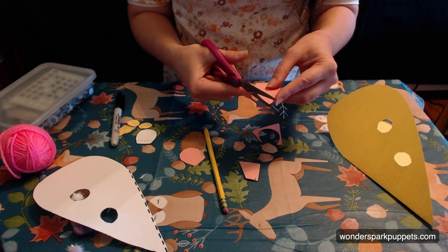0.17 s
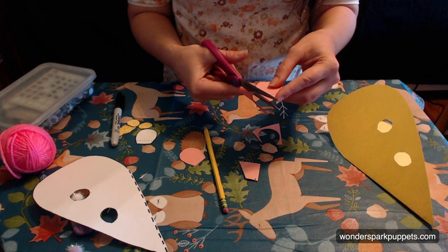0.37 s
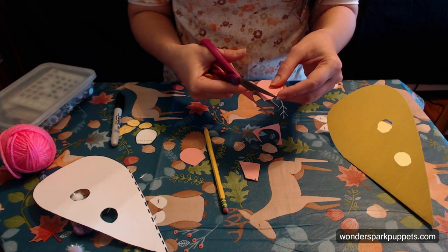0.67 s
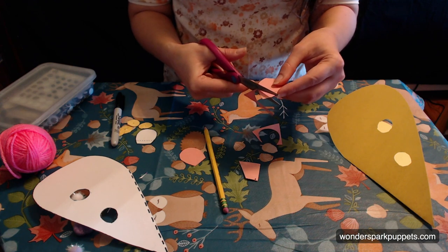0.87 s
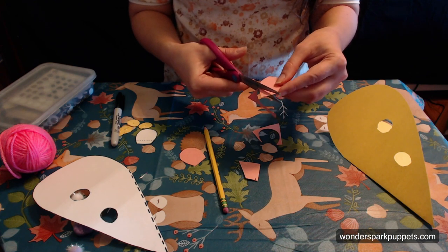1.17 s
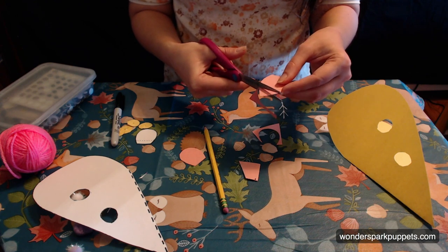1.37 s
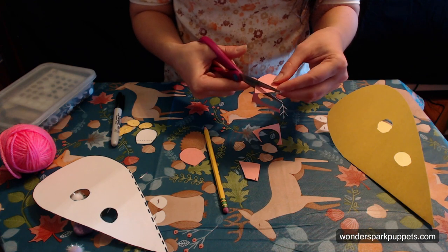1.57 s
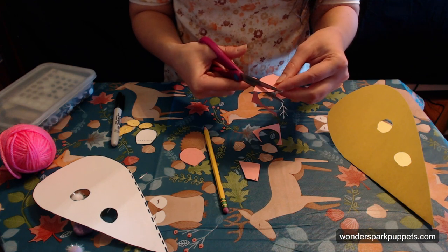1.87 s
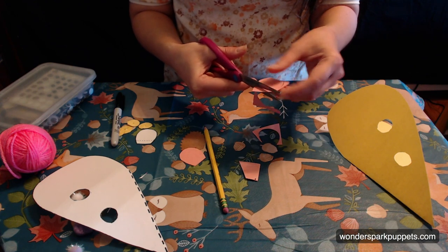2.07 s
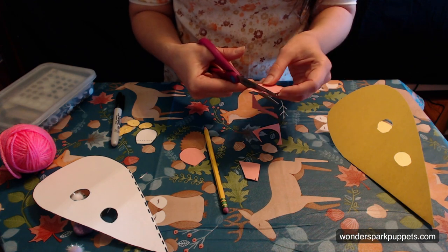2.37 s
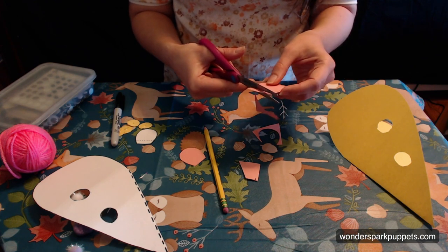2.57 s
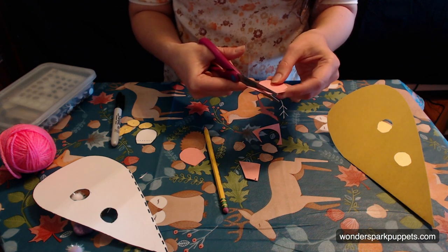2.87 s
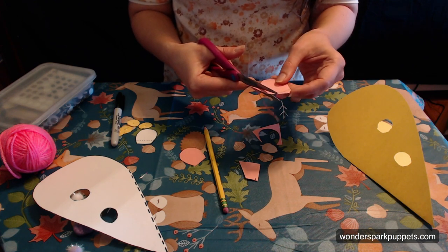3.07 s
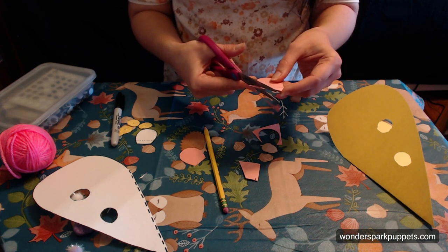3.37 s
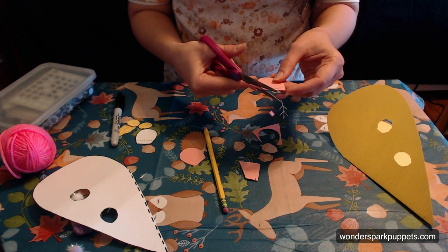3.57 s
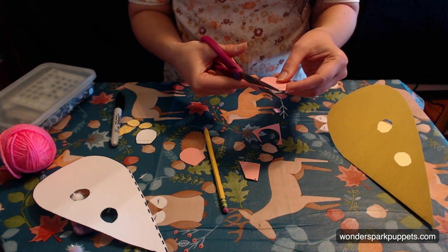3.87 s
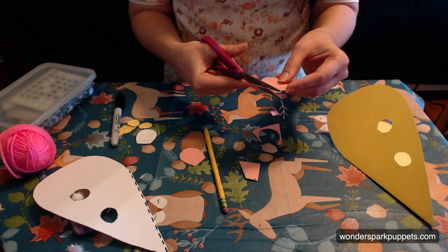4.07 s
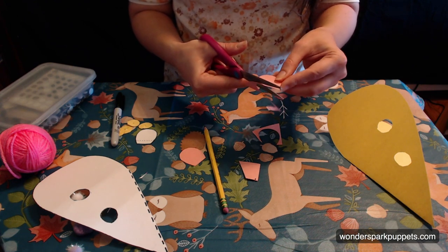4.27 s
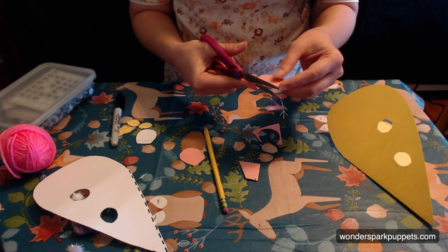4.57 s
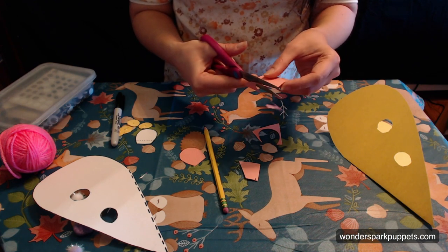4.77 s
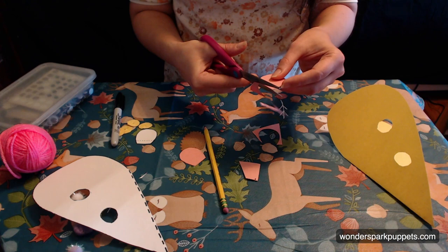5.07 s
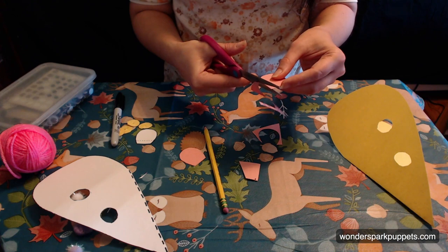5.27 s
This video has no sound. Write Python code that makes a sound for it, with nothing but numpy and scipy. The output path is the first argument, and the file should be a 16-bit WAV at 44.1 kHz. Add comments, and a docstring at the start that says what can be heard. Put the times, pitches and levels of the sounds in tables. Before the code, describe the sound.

Small scissors make a few quiet snips in stiff paper, which crackles and rustles in the fingers over a low ventilation hum.

```python
"""Over a ventilation hum, a deep rumble and a soft hiss, small scissors crunch into a scrap of paper.
Each cut is a dense train of fibre fractures that excites the resonances of the clamped sheet.
Between cuts the stiff scrap is turned in the fingers: it rustles, buckles with sharp snaps and slides
along a blade. Impacts set the handles knocking and the blades clinking; the blades rub as they open,
and forearms shift on the craft table. The table top and the near walls add brief reflections."""
import sys
import numpy as np
from scipy import signal
from scipy.fft import rfft, irfft
from scipy.io import wavfile

SR = 44100
rng = np.random.default_rng(int(sys.argv[2]) if len(sys.argv) > 2 else 0)


def store_pcm(level_fs):
    """Save levels as 16-bit WAV."""
    pcm = np.round(np.clip(level_fs, -1, 1) * 32767).astype(np.int16)
    wavfile.write(sys.argv[1], SR, np.atleast_2d(pcm).T)


N = 238168


def from_db(db):
    """Decibels to gain."""
    return 10 ** (np.asarray(db) / 20)


def rms_one(x):
    """Scale to rms 1."""
    return x / np.sqrt(np.mean(x ** 2) + 1e-20)


def gesture(attack_s, release_s, start, length, db, swell_db=0):
    """Amplitude envelope of a movement: it gathers speed, holds or swells, then decays exponentially."""
    age = np.arange(N) / SR - start
    rise = np.clip(age / attack_s, 0, 1) ** 2
    hold = from_db(db - swell_db * np.clip(1 - age / length, 0, 1))
    return rise * hold * np.exp(-np.maximum(age - length, 0) / release_s)


def motion(rows, attack_s, release_s):
    """Superposed envelopes of all movements of one kind, which share their attack and release."""
    return sum(gesture(attack_s, release_s, *row) for row in rows)


def coloured(x, spectrum):
    """Spectral shaping by a smooth curve that rolls off beyond its ends; unit rms."""
    hz, db = np.transpose(spectrum)
    f = np.maximum(np.fft.rfftfreq(N, 1 / SR), 1)
    ends = np.minimum(f / hz[0], 1) ** 2 * np.minimum(hz[-1] / f, 1) ** 2
    return rms_one(irfft(rfft(x) * ends * from_db(np.interp(np.log(f), np.log(hz), db)), N))


def peak(x, hz, width_hz, db):
    """A resonance that lifts, or a notch that cuts, a band of x."""
    k, g, c = np.tan(np.pi * width_hz / SR), from_db(db / 2), -2 * np.cos(2 * np.pi * hz / SR)
    return signal.lfilter([1 + k * g, c, 1 - k * g], [1 + k / g, c, 1 - k / g], x)


def resonant_noise(resonances):
    """Random excitation of bell-shaped resonances, each at its own rms level."""
    f = np.fft.rfftfreq(N, 1 / SR)
    shapes = [from_db(db) * rms_one(1 / (1 + ((f - hz) / width_hz) ** 2))
              for hz, width_hz, db in resonances]
    return irfft(rfft(rng.standard_normal(N)) * sum(shapes), N)


def fibres(per_s, spread_db, decay_s):
    """Shot noise: fibres give way at random, each with a tiny noise burst of its own size."""
    sizes = from_db(abs(spread_db) * np.minimum(rng.exponential(1, N), np.pi))
    breaks = sizes * (rng.random(N) < per_s / SR)
    power = signal.lfilter([1], [1, -np.exp(-2 / (decay_s * SR))], breaks ** 2 + 1e-18)
    return np.sqrt(power) * rng.standard_normal(N)


def dry_burst(noise, envelope):
    """Whitening: a noise burst with a nearly flat spectrum has no pitch of its own."""
    even = irfft(np.exp(1j * np.angle(rfft(noise * envelope))))
    return even * np.minimum(10 * envelope, 1)


def ring(clicks, hz, t60):
    """A unit click sets a sine of height 1 ringing."""
    r, w = np.exp(-np.log(1000) / (t60 * SR)), 2 * np.pi * hz / SR
    return signal.lfilter([0, np.sin(w)], [1, -2 * r * np.cos(w), r * r], clicks + 1e-18)


def struck(times, db, hz, t60):
    """Impulse response of one mode: each strike starts a damped sinusoid."""
    clicks = np.zeros(N)
    clicks[np.round(times * SR).astype(int)] = from_db(db)
    return ring(clicks, hz, t60)


def air_hiss():
    """Stationary broadband noise: the soft hiss of the room air."""
    # air spectrum: (frequency [Hz], relative density [dB])
    air_spectrum = [(53, -42.5), (90, -2), (120, -5.5), (264, -12), (317, -15), (631, -17), (967, -19),
                    (1230, -19.5), (1420, -22), (2410, -22), (3200, -28), (4000, -27), (6380, -31),
                    (7980, -30.5), (11500, -32.5), (15000, -79), (22000, -120)]
    return from_db(-58.5 - 1.83) * coloured(rng.standard_normal(N), air_spectrum)


def ventilation():
    """Duct resonances turn noise into wavering tones, over a motor drone that wanders in pitch."""
    # hum and duct resonances: (frequency [Hz], width [Hz], relative level [dB])
    ducts = [(66.3, 9.4, -60), (196, 7.8, -75), (258.9, 9.5, -72), (333.2, 9.9, -76), (844.8, 7.4, -79),
             (993, 12, -83.5), (1223, 30, -80.5), (2163, 6, -86.5), (2307, 1.4, -80), (2376, 230, -76.5),
             (3800, 410, -82.5)]
    # slow swell of the hum: (time [s], gain [dB])
    hum_swell = [(0.0, 1), (0.7, -1), (1.3, 0.5), (2.2, -1), (2.8, 2), (3.6, 0.5), (4.2, 0.5), (5.4, -0.5)]
    hum = resonant_noise(ducts)
    motor_hz, wander_hz = 65.8, 4.9
    phase = np.angle(signal.hilbert(resonant_noise([(motor_hz, wander_hz, 0)])))
    drone = from_db(-57) * rms_one(np.cos(phase))
    return from_db(np.interp(np.arange(N) / SR, *np.transpose(hum_swell))) * (hum + drone)


def deep_rumble():
    """Slow amplitude modulation makes low-frequency noise swell and sink."""
    # course of the rumble: (time [s], relative level [dB])
    rumble_levels = [(0.0, -41), (0.28, -42.5), (0.45, -38), (0.75, -38.5), (0.95, -34), (1.3, -38),
                     (1.95, -38), (2.45, -37), (2.9, -38.5), (3.35, -42), (3.6, -34), (3.95, -43.5),
                     (4.15, -44), (4.4, -40.5), (4.85, -37.5), (5.4, -47.5)]
    # rumble spectrum: (frequency [Hz], relative density [dB])
    rumble_spectrum = [(6, -4), (12, 5), (20, 1.5), (30, -13.5), (45, -21), (80, -31), (130, -36),
                       (250, -59.5)]
    swell = from_db(np.interp(np.arange(N) / SR, *np.transpose(rumble_levels)) - 1)
    return swell * coloured(rng.standard_normal(N), rumble_spectrum)


def cuts():
    """Shear fracture of fibres excites the clamped scrap, whose resonances change as the blades close."""
    # cutting strokes: (time [s], duration [s], relative final level [dB], swell [dB])
    strokes = [(0.021, 0.088, -59.5, 7), (1.511, 0.087, -56, -0.5), (4.154, 0.125, -75, 4),
               (5.33, 0.06, -57, 8.5)]
    # shearing spectrum: (frequency [Hz], relative density [dB])
    cut_spectrum = [(500, -16), (1100, -2), (1800, -1), (2600, -2.5), (4000, 2.5), (5300, 3), (6500, 2),
                    (8000, 6.5), (10000, 6.5), (11700, 1.5)]
    # scrap resonances: (frequency [Hz], width [Hz], gain open [dB], half closed [dB], closed [dB])
    scrap_resonances = [(1590, 530, 8, 1, 5.5), (1930, 330, 10, 8, 7), (2630, 260, -20, -21, -6),
                        (2920, 300, 16.5, 4, 1.5), (3270, 200, 0, 7, 2), (3620, 310, -3, 1, 1),
                        (3990, 380, 13, 13, 4.5), (4430, 220, -7, -9, 1), (4700, 260, 10.5, 7, -2),
                        (5130, 420, 1, 4, 5), (6300, 400, 4, 8, -2), (6800, 340, 1, 7, 3),
                        (7680, 300, 8, 9, 5.5), (8700, 350, -1, 8, 5), (9300, 230, 7, 6, -4),
                        (11300, 400, 1, 2, 2)]
    # blades open, half closed, closed: (share of the bite [0-1])
    stages = [0.18, 0.38, 0.58]
    grain = fibres(per_s=7000, spread_db=1.7, decay_s=0.0004)
    travel = [point for start, length, *_ in strokes
              for point in ((start, 0), (start + length, 1), (start + 2 * length, 1))]
    bite = np.interp(np.arange(N) / SR, *np.transpose(travel)) ** 2
    crunch = 0
    for stage in range(3):
        shaken = grain
        for hz, width_hz, *stage_db in scrap_resonances:
            shaken = peak(shaken, hz, width_hz, stage_db[stage])
        crossfade = np.interp(bite, stages, np.arange(3) == stage)
        crunch = crunch + crossfade * coloured(shaken, cut_spectrum)
    body = signal.sosfiltfilt(signal.butter(2, 7000, fs=SR, output="sos"), crunch)
    force = motion(strokes, attack_s=0.025, release_s=0.0087)
    treble = force / force.max() * (crunch - body)   # a harder stroke is brighter
    return from_db(4.5) * force * (body + treble)


def tilted(x, db_per_octave):
    """Spectral tilt: three treble bands are weighted towards bright or dull."""
    # band edges: (frequency [Hz])
    edges_hz = [1400, 2800, 6500, 12000]
    out = 0
    for low, high in zip(edges_hz, edges_hz[1:]):
        sos = signal.butter(3, [low, high], "band", fs=SR, output="sos")
        octaves = np.log2(np.sqrt(low * high) / edges_hz[0])
        out = out + from_db(db_per_octave * octaves) * signal.sosfilt(sos, x)
    return out


def snaps():
    """Buckling of stiff paper: a crack coloured by the blades, and two brief rings of the bent sheet."""
    # buckles: (time [s], relative level [dB], tilt [dB/octave], rise [s], decay [s],
    # main ring [Hz], second ring [Hz], rings relative to crack [dB])
    buckles = [ (0.0415, -64, 3, 0.0023, 0.002, 4250, 2130, -0.5),
               (0.107, -65, -3, 0.002, 0.002, 1400, 3900, 1),
               (0.3377, -63, 9, 0.002, 0.003, 10250, 5200, -2),
               (0.6245, -62, -1, 0.0022, 0.0033, 4120, 6640, -1.5),
               (1.077, -67, 3, 0.0033, 0.004, 4220, 8550, -7), (1.089, -69, 0, 0.004, 0.005, 4150, 8550, 0),
               (1.107, -61.5, 6, 0.0053, 0.0039, 4070, 4340, -1),
               (1.139, -69, -1, 0.0022, 0.002, 8610, 3920, -7),
               (1.2259, -63, -2.5, 0.0015, 0.003, 2380, 2900, -1),
               (1.2632, -59.5, 1, 0.0018, 0.005, 4050, 8700, -5),
               (1.278, -68, 5, 0.0015, 0.0015, 8720, 4100, -12),
               (1.358, -57.5, -2, 0.002, 0.0042, 8580, 3900, -0.5),
               (1.513, -62, 1, 0.0052, 0.0063, 3950, 9300, -8),
               (1.595, -63, -4, 0.003, 0.0037, 1610, 1860, 3),
               (1.626, -60.5, -1, 0.0055, 0.006, 4940, 3850, -4),
               (1.8274, -58.5, -2, 0.004, 0.004, 8550, 4940, -12),
               (1.854, -57.5, -2, 0.0044, 0.0034, 10240, 3980, -4),
               (1.882, -54, -1, 0.0061, 0.004, 1880, 4960, -9),
               (1.915, -63, -5, 0.0013, 0.003, 2340, 2900, -12),
               (1.9688, -54.5, -1.5, 0.0014, 0.0011, 4050, 3040, 0.5),
               (2.026, -55, 1.5, 0.0018, 0.0008, 4000, 5800, 0),
               (2.0364, -56.5, -2, 0.0015, 0.0018, 5600, 9900, -5),
               (2.071, -66, 3, 0.0015, 0.002, 5200, 2950, -15),
               (2.0797, -54.5, -1, 0.0019, 0.0014, 5130, 2870, -5),
               (2.088, -62, 1, 0.00072, 0.0014, 2870, 2310, -2),
               (2.27, -61, -0.5, 0.0037, 0.0038, 3950, 2410, -3),
               (2.41, -60.5, -5, 0.0017, 0.0042, 1980, 8350, -7),
               (2.562, -58.5, 1, 0.0034, 0.0033, 3710, 2170, 0.5),
               (2.703, -65, 0, 0.0022, 0.0015, 3900, 8400, -14),
               (2.718, -60, 5, 0.0011, 0.0018, 3900, 8830, -14),
               (2.729, -55, 0.5, 0.0014, 0.0016, 3020, 8370, -6),
               (2.775, -63, 8, 0.002, 0.0039, 3030, 8400, -2),
               (2.7849, -50, 1.5, 0.0011, 0.004, 7700, 3120, 0),
               (2.864, -59, 5, 0.0013, 0.0013, 10750, 4000, -15),
               (2.8695, -59.5, 3, 0.0016, 0.0012, 10750, 3930, -15),
               (2.8738, -54, 0, 0.0013, 0.0021, 10800, 3870, -1),
               (2.913, -68, -3, 0.0019, 0.002, 3930, 11300, -12),
               (2.924, -52.5, 2, 0.0019, 0.002, 4900, 10800, -13),
               (2.947, -64, -4, 0.0016, 0.003, 3430, 9600, 2),
               (2.953, -54, 6, 0.0027, 0.0024, 3700, 9400, -13),
               (2.958, -48, 0.5, 0.0012, 0.0011, 3610, 3960, -3.5),
               (2.968, -55, 6, 0.0037, 0.003, 10800, 3970, -6),
               (2.985, -62, -3, 0.0018, 0.002, 3790, 6160, -13),
               (3, -57.5, 7, 0.00084, 0.0015, 6500, 10800, 0),
               (3.009, -59.5, 12, 0.0014, 0.003, 10700, 6000, -13),
               (3.0204, -56.5, 9, 0.0028, 0.0012, 10300, 5400, -3),
               (3.035, -65, 1, 0.0015, 0.0015, 10500, 3320, -9),
               (3.424, -55, 0, 0.0052, 0.0068, 2740, 7980, -8),
               (3.463, -62, 2, 0.0017, 0.0018, 6640, 1910, -3),
               (3.494, -57.5, 4, 0.0026, 0.004, 5630, 2300, -4),
               (3.5451, -57, -2, 0.00051, 0.0013, 3920, 8400, -3),
               (3.55, -58, 2, 0.0017, 0.002, 8450, 3740, -15),
               (3.5712, -54, 2, 0.0012, 0.008, 10160, 4900, -3),
               (3.5763, -52.5, -1, 0.00079, 0.0017, 10300, 5300, 1),
               (3.593, -64, 7, 0.0015, 0.0015, 5000, 10200, -10),
               (3.6215, -54.5, 4, 0.0025, 0.0081, 6000, 5500, -2.5),
               (3.727, -63, 4, 0.0018, 0.004, 5990, 9800, -10),
               (3.786, -55, -0.5, 0.0057, 0.0026, 10140, 2110, -6),
               (3.8128, -56, 0, 0.0031, 0.0031, 5900, 3880, -9),
               (4.006, -61, -1, 0.003, 0.005, 6750, 3670, -3),
               (4.024, -64.5, 6, 0.0016, 0.0022, 6700, 3880, -1),
               (4.1402, -66, 5, 0.001, 0.0062, 3450, 2110, 2.5),
               (4.293, -61, -9, 0.0015, 0.0024, 1830, 2130, 1.5),
               (4.292, -59, 12, 0.002, 0.0023, 6670, 8700, -2),
               (4.484, -57, 1, 0.004, 0.005, 5480, 4020, -13),
               (4.502, -63, 6, 0.0017, 0.002, 5530, 9800, -14),
               (4.521, -65, 7, 0.002, 0.003, 5500, 9800, -14),
               (4.5796, -61.5, 2, 0.002, 0.0033, 2060, 9790, -14),
               (4.801, -60.5, 4, 0.0045, 0.003, 3790, 1910, -3),
               (4.922, -63.5, 10, 0.0025, 0.004, 8700, 10200, -14),
               (4.9385, -62, 4, 0.0018, 0.0031, 2400, 9700, -4),
               (4.989, -61.5, 8, 0.0014, 0.0025, 5500, 1970, -5),
               (5.088, -57, 0.5, 0.0065, 0.0039, 8530, 5640, -11),
               (5.157, -62.5, 0, 0.0011, 0.003, 2130, 3800, -8),
               (5.171, -66, 0, 0.00091, 0.003, 7200, 2400, -1), ]
    # resonances of the steel blades: (frequency [Hz], width [Hz], gain [dB])
    blades = [(1970, 310, 9.5), (2910, 200, 2.5), (3870, 160, 3), (4050, 1500, 2.5), (5600, 1100, 5.5),
              (8470, 1200, 4.5), (9800, 160, 3)]
    size, ring_decay_s, second_ring_db = 2048, 0.0012, -3.5
    out, age = np.zeros(N + size), np.arange(size) / SR
    energy_scale = np.sqrt(0.01 * SR / size)   # levels refer to the energy spread over 10 ms
    for time, db, tilt, rise_s, decay_s, hz, second_hz, ring_db in buckles:
        rise, after = np.minimum(age / rise_s, 1), np.maximum(age - rise_s, 0)
        crack = dry_burst(rng.standard_normal(size), rise * np.exp(-after / decay_s))
        for blade in blades:
            crack = peak(crack, *blade)
        low_cut_hz = min(0.56 * min(hz, second_hz), 1950)   # a small fold radiates little below its ring
        crack = signal.sosfilt(signal.butter(4, low_cut_hz, "high", fs=SR, output="sos"), crack)
        rings = np.sin(2 * np.pi * hz * age)
        rings += from_db(second_ring_db) * np.sin(2 * np.pi * second_hz * age)
        rings *= rise * np.exp(-after / ring_decay_s)
        burst = rms_one(tilted(crack, tilt)) + from_db(ring_db) * rms_one(rings)
        start = round(time * SR)
        out[start:start + size] += from_db(db - 1.4) * energy_scale * burst
    return out[:N]


def handle_knocks():
    """Modal excitation: a knock rings all handle modes, most of all near the pitch its contact favours."""
    # soft knocks in the hand: (time [s], relative level [dB], favoured frequency [Hz])
    contacts = [(0.043, -52.5, 700), (0.92, -54, 1050), (1.227, -52.5, 900), (2.731, -51, 900),
                (2.785, -48.5, 550), (2.957, -49.5, 900), (3.545, -45, 900), (3.578, -52, 480),
                (3.817, -58, 900), (4.294, -52, 634), (4.486, -59, 700), (5.094, -53.5, 600)]
    # handle modes: (frequency [Hz], gain [dB], 60 dB decay time [s])
    handle_modes = [(453, -18, 0.027), (634, -6.5, 0.035), (910, -1.5, 0.026), (1060, -13.5, 0.039),
                    (1226, -4.5, 0.024), (1940, -7, 0.036)]
    times, db, favoured_hz = np.transpose(contacts)
    out = 0
    for k, (hz, mode_db, t60) in enumerate(handle_modes):
        loss_db = 3.5 * abs(np.log2(hz / favoured_hz))
        out = out + (-1) ** k * struck(times, db + mode_db - loss_db, hz, t60)
    return out


def paper_rustle():
    """Crackling noise: the scrap emits sparse bursts as it bends in the fingers."""
    # turns of the scrap: (time [s], duration [s], level [dB])
    turns = [(0.298, 0.069, -69), (0.415, 0.073, -72), (0.64, 0.05, -70), (1.065, 0.087, -65.5),
             (1.255, 0.057, -69), (1.805, 0.12, -68), (2.03, 0.1, -70), (2.13, 0.54, -68),
             (2.74, 0.28, -64.5), (3.44, 0.24, -66.5), (3.77, 0.084, -67), (4.48, 0.58, -72.5)]
    # rustle spectrum: (frequency [Hz], relative density [dB])
    rustle_spectrum = [(700, 6), (1400, -4.5), (2100, 4), (2800, 0.5), (4000, 2), (5500, -1), (7000, 2.5),
                       (9000, 4), (10500, -2.5), (12000, -6)]
    crackle = coloured(fibres(per_s=260, spread_db=4.5, decay_s=0.004), rustle_spectrum)
    return motion(turns, attack_s=0.019, release_s=0.012) * crackle


def blade_openings():
    """Friction of steel on steel excites narrow resonances, topped by a thin squeak."""
    # opening strokes: (time [s], duration [s], relative level [dB])
    strokes = [(0.305, 0.066, -74.5), (4.18, 0.11, -74.5)]
    # resonances of the rubbing blades: (frequency [Hz], width [Hz], relative level [dB])
    steel_resonances = [(3430, 410, -2.5), (4070, 170, -4), (5070, 150, -22), (10250, 310, 3.5)]
    return motion(strokes, attack_s=0.018, release_s=0.0073) * resonant_noise(steel_resonances)


def forearms():
    """Friction and forced vibration: arms brush dully over the cloth and make the table murmur."""
    # brushes over the cloth: (time [s], duration [s], level [dB])
    brushes = [(1.16, 0.13, -62), (1.85, 0.29, -63.5), (2.68, 0.21, -66)]
    # cloth spectrum: (frequency [Hz], relative density [dB])
    cloth_spectrum = [(130, 1), (185, -1.5), (270, -9), (500, -20.5), (900, -18)]
    # shifts against the table edge: (time [s], duration [s], relative level [dB])
    shifts = [(2.14, 0.19, -62), (2.52, 0.16, -64.5), (3.26, 0.11, -53.5), (3.47, 0.33, -58.5),
              (4.06, 0.18, -59.5), (4.43, 0.61, -66)]
    # table spectrum: (frequency [Hz], relative density [dB])
    table_spectrum = [(45, -5), (78, 5), (115, -4.5), (160, -20.5), (300, -25.5)]
    attack_s, release_s = 0.0186, 0.033
    murmur = from_db(3) * coloured(rng.standard_normal(N), table_spectrum)
    cloth = coloured(rng.standard_normal(N), cloth_spectrum)
    return motion(brushes, attack_s, release_s) * cloth + motion(shifts, attack_s, release_s) * murmur


def finger_rubs():
    """Friction of skin on the sheet and the handles gives a dull, grainy noise."""
    # fingertip movements: (time [s], duration [s], relative level [dB])
    rubs = [(2.54, 0.14, -65), (2.89, 0.17, -68), (3.17, 0.11, -82), (3.51, 0.16, -68.5),
            (3.77, 0.084, -72), (4.04, 0.13, -63.5), (4.41, 0.11, -65.5)]
    # rubbing spectrum: (frequency [Hz], relative density [dB])
    rub_spectrum = [(250, -9), (520, -2), (720, -2), (880, 7.5), (1150, -32), (1600, -35), (3000, -20)]
    skin = coloured(fibres(per_s=400, spread_db=5.5, decay_s=0.0013), rub_spectrum)
    return from_db(-2.5) * motion(rubs, attack_s=0.0073, release_s=0.068) * skin


def blade_clinks():
    """Free vibration after impact: the blades meet as they shut and ring briefly."""
    # impacts: (time [s], relative level [dB])
    closings = [(2.784, -52), (2.959, -75)]
    # steel modes: (frequency [Hz], gain [dB], 60 dB decay time [s])
    steel_modes = [(3126, -4, 0.07), (4410, 0.5, 0.061), (5480, -2, 0.05), (7670, -1, 0.07),
                   (8350, 4, 0.04)]
    times, db = np.transpose(closings)
    return sum(struck(times, db + mode_db, hz, t60) for hz, mode_db, t60 in steel_modes)


def paper_slides():
    """Sliding friction of paper along a blade: dense, tiny bursts merge into a fine grain."""
    # slides: (time [s], duration [s], relative final level [dB], swell [dB])
    strokes = [(3.085, 0.16, -56, 8.5), (4.145, 0.14, -64, -0.5)]
    # sliding spectrum: (frequency [Hz], relative density [dB])
    slide_spectrum = [(600, 5.5), (1500, -4), (2200, 3.5), (2800, 2), (3600, 0), (4500, 1), (6500, 1),
                      (8900, 4.5), (10700, 3), (11800, -9)]
    grain = coloured(fibres(per_s=4000, spread_db=2.4, decay_s=0.0005), slide_spectrum)
    return from_db(1) * motion(strokes, attack_s=0.047, release_s=0.032) * grain


def room(x, t60, wet_db, delay_s):
    """Reflection: the table top returns one quick echo, the near walls a short, diffuse tail."""
    echo_s, echo_db = 0.0064, -13
    echo = from_db(echo_db) * np.pad(x, (round(echo_s * SR), 0))[:N]
    age = np.arange(SR // 2) / SR
    onset = np.clip(age / delay_s - 1, 0, 1)
    tail = dry_burst(rng.standard_normal(len(age)), onset * np.exp(-np.log(1000) * age / t60))
    return x + echo + from_db(wet_db) * signal.fftconvolve(x, tail / np.sqrt(np.sum(tail ** 2)))[:N]


def scene():
    """Superposition of scissors, paper, their reflections, the arms and the background, in mono."""
    work = snaps() + cuts() + paper_slides() + blade_openings()
    work += paper_rustle() + finger_rubs() + handle_knocks() + blade_clinks()
    in_room = room(work, t60=0.12, wet_db=-4, delay_s=0.0014)
    return (in_room + forearms() + air_hiss() + ventilation() + deep_rumble())[None]


def record(dry):
    """Band limiting: a steep low-pass filter removes the treble above 11.7 kHz."""
    return signal.sosfilt(signal.ellip(12, 0.1, 70, 11700, fs=SR, output="sos"), dry)


dry = scene()
out = record(dry)
store_pcm(out)
```